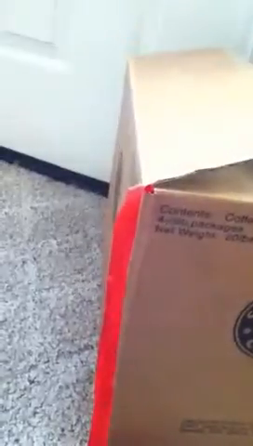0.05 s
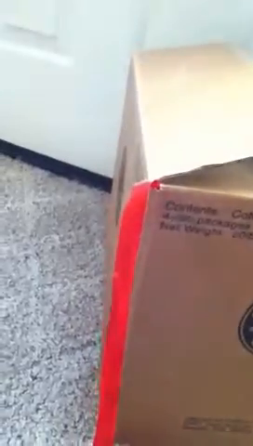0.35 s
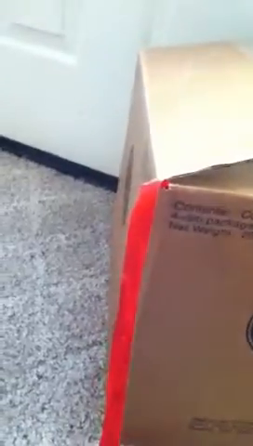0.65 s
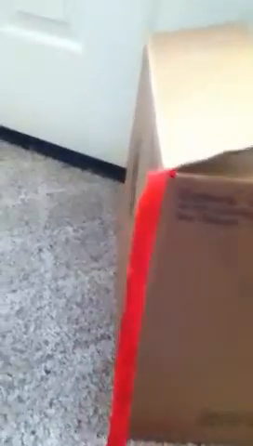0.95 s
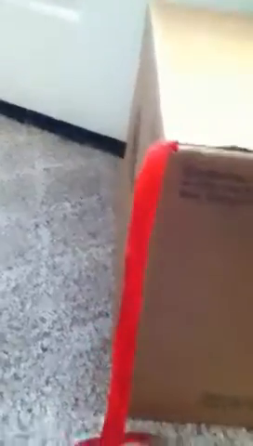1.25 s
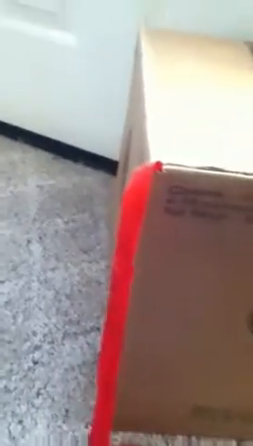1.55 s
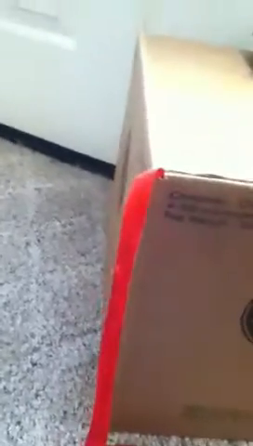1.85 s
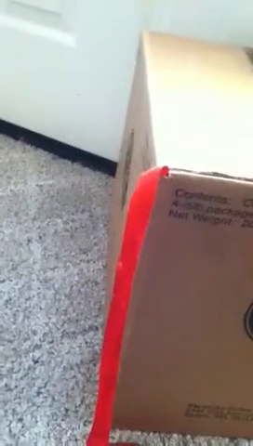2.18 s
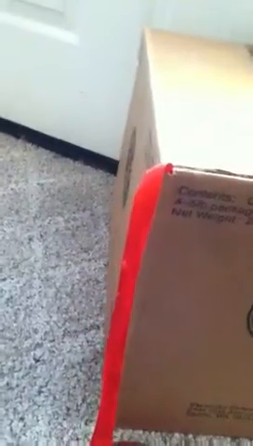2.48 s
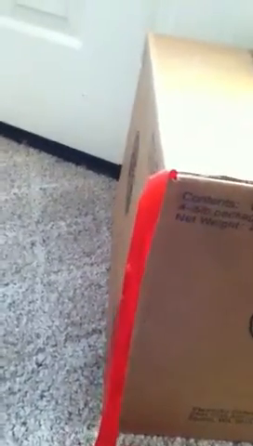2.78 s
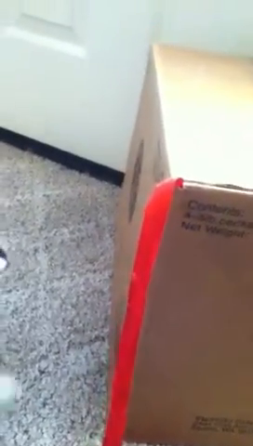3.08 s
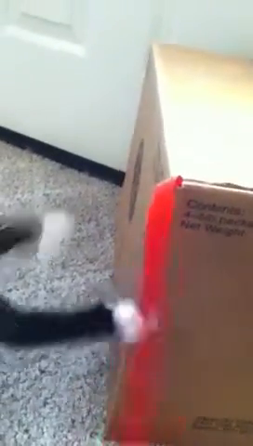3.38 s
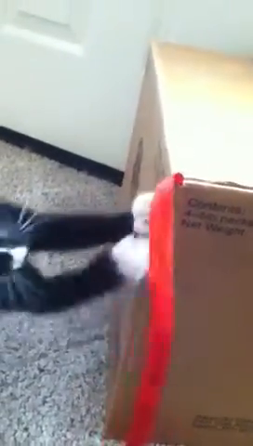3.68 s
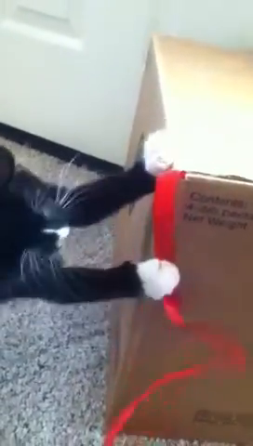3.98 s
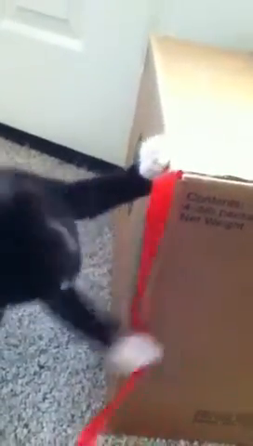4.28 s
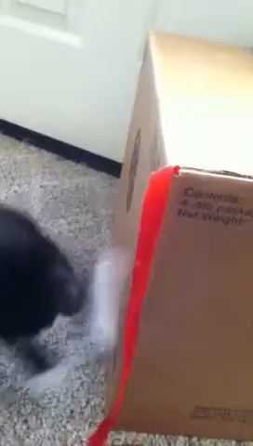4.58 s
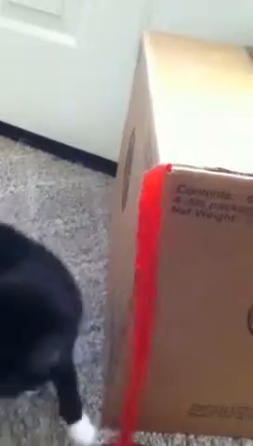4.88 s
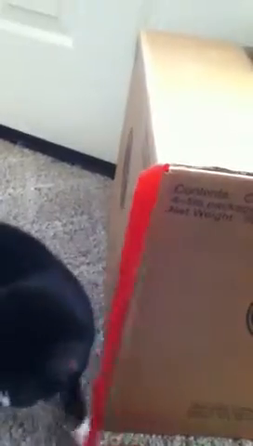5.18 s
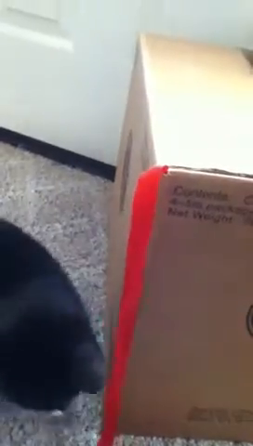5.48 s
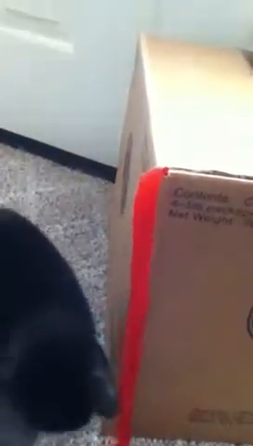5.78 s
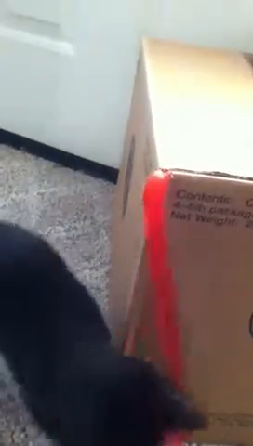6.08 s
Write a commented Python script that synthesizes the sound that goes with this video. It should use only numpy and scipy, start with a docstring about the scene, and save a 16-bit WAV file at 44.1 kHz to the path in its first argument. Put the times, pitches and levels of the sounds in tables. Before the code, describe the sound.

Close to the microphone, claws tick and scratch lightly on a cardboard box while fur and ribbon rustle against it. A single dull thump interrupts the faint sounds. Then the cat bats the box several times in quick succession, making hollow, papery knocks, the loudest sounds heard. It settles to soft brushing and ends with one more bump and a claw drag. The small indoor room is otherwise quiet.

```python
"""Faint brushing and light scratches on cardboard, then hollow thumps: a kitten plays at a box.
Fur and a cloth ribbon hiss over the surface, pads judder as they push the walls,
and claws scrape and click on the paper skin. Paw blows, the loudest sounds, make the box ring and boom.
The box stands close by, on the carpet of a small, quiet room."""
import sys
import numpy as np
from scipy import signal
from scipy.fft import rfft, irfft, next_fast_len
from scipy.io import wavfile
from scipy.ndimage import map_coordinates

SR = 44100
rng = np.random.default_rng(int(sys.argv[2]) if len(sys.argv) > 2 else 0)


def int16_out(signal):
    """Quantize to a 16-bit WAV file."""
    q = np.round(np.clip(np.atleast_2d(signal).T, -1, 1) * 32767)
    wavfile.write(sys.argv[1], SR, q.astype(np.int16))


N = 275625


def amp(db):
    """Decibels to gain."""
    return 10 ** (np.asarray(db) / 20)


def unit(x):
    """Scale to rms 1."""
    return x / np.sqrt(np.mean(x ** 2) + 1e-20)


def along(points, hz):
    """Interpolate (freq_hz, value) points on a log frequency axis."""
    freq_hz, values = np.transpose(points)
    return np.interp(np.log(hz + 1), np.log(freq_hz + 1), values)


def add(track, start_s, sound):
    """Mix sound into track at start_s."""
    part = track[max(round(start_s * SR), 0):][:len(sound)]
    part += sound[:len(part)]


def filtered(x, response):
    """Apply a complex frequency response."""
    size = next_fast_len(len(x) + 8192)
    return irfft(rfft(x, size) * response(np.fft.rfftfreq(size, 1 / SR)), size)[:len(x)]


def coloured(x, spectrum):
    """Shape x by (freq_hz, gain_db) points; rms 1."""
    return unit(filtered(x, lambda f: amp(along(spectrum, f))))


def resonances(modes, f):
    """Response of (freq_hz, width_hz, gain_db) modes, summed with alternating sign."""
    return sum((-1) ** k * amp(db) * 1j * f * width_hz / (hz * hz - f * f + 1j * f * width_hz)
               for k, (hz, width_hz, db) in enumerate(modes))


def band(x, hz, breadth):
    """One resonance, breadth * hz wide; rms 1."""
    return unit(filtered(x, lambda f: resonances([(hz, breadth * hz, 0)], f)))


def gliding(x, hz, breadth, count=4):
    """Resonance that follows hz by cross-fading static bands."""
    centres_hz = np.geomspace(hz.min(), hz.max() + 1, count)
    return sum(np.interp(hz, centres_hz, share) * band(x, centre_hz, breadth)
               for centre_hz, share in zip(centres_hz, np.eye(count)))


def curves(rows):
    """Gain and pitch per sample from (time_s, level_db, pitch_hz) rows; silent outside them."""
    time_s, level_db, pitch_hz = np.transpose(rows)
    t = np.arange(N) / SR
    active = (t >= time_s[0]) & (t <= time_s[-1])
    return amp(np.interp(t, time_s, level_db)) * active, np.interp(t, time_s, pitch_hz)


def stroke(peak_s, rise_s, fall_s):
    """Speed of one movement: Gaussian swell and decay."""
    t = np.arange(N) / SR - peak_s
    width_s = np.where(t < 0, rise_s, fall_s)
    return np.exp(-np.minimum((t / width_s) ** 2 / 2, 30))


def sweep(start_s, length_s, rise_share=0.16, release_share=0.66):
    """Speed of one sweep: ramp, hold, decay."""
    t = np.arange(N) / SR - start_s
    ramp = np.clip(t / (rise_share * length_s), 0, 1)
    return ramp * np.exp(-np.maximum(t - length_s, 0) / (release_share * length_s))


def friction(n, rate_hz, smooth):
    """Random slips, mostly small, over smooth sliding noise."""
    slips = (rng.random(n) < rate_hz / SR) * rng.laplace(size=n)
    return unit(slips) + smooth * rng.standard_normal(n)


def grip(rate_hz, depth_db):
    """Gain of a contact that catches and lets go at random."""
    knots = rng.standard_normal(int(N * rate_hz / SR) + 4)
    wander = map_coordinates(knots, [np.arange(N) * rate_hz / SR], order=1)
    return unit(amp(depth_db * wander))


# room tone: freq_hz, gain_db
AIR_SPECTRUM = [(15, -46), (25, -12.5), (107, -0.5), (144, -4), (205, -3), (352, -10), (403, -7.5),
                (654, -12.5), (1360, -15.5), (1470, -16.5), (1590, -17.5), (1780, -16.5), (15800, -26.5)]


def air():
    """Steady room tone: low rumble, faint hiss."""
    return amp(-58) * coloured(rng.standard_normal(N), AIR_SPECTRUM)


# room decay: freq_hz, t60_s
ROOM_DECAY = [(150, 0.66), (800, 0.52), (3000, 0.47), (10000, 1)]
# door and wall echoes: delay_s, gain_db
ROOM_ECHOES = [(0.0223, -15), (0.035, -32.5), (.038, -12)]


def room(x):
    """Dull echoes off door and walls, plus the short tail of a carpeted room."""
    hz, t, noise = signal.stft(rng.standard_normal(SR // 2), SR, nperseg=256)
    decay = amp(-60 * t / along(ROOM_DECAY, hz)[:, None])
    build_up = 1 - np.exp(-t / 0.0125)
    tail = signal.istft(noise * decay * build_up, SR, nperseg=256)[1]
    tail = filtered(tail / np.linalg.norm(tail), lambda f: 1 / (1 + 1j * f / 2500))
    out = np.zeros(N)
    add(out, 0.008, amp(-14) * signal.fftconvolve(x, tail))
    dull = filtered(x, lambda f: 1 / (1 + (f / 700) ** 2))
    for delay_s, gain_db in ROOM_ECHOES:
        add(out, delay_s, amp(gain_db) * dull)
    return out


# bending waves back from the folds: delay_s, gain_db
FOLD_ECHOES = [(.0009, -35), (.0026, -22.5), (.0048, -22.5)]


def rubbing(rate_hz, smooth, grip_hz, depth_db):
    """Uneven friction on cardboard; reflections from the folds ripple its spectrum."""
    contact = friction(N, rate_hz, smooth) * grip(grip_hz, depth_db)
    out = contact.copy()
    for delay_s, gain_db in FOLD_ECHOES:
        add(out, delay_s, amp(gain_db) * contact)
    return unit(out)


# brushed wall: freq_hz, gain_db
MURMUR_SPECTRUM = [(40, -23), (100, -5.5), (220, 5.5), (380, 1), (510, -8.5), (780, -0.5), (1350, -7),
                   (2000, -7), (4500, -18), (9000, -28.5), (16000, -41)]
# brushed surface fibres: freq_hz, gain_db
HISS_SPECTRUM = [(500, -13), (2500, 6.5), (4500, 0.5), (6500, -2.5), (9000, -1), (11000, -6), (13000, -12),
                 (16000, -38)]
# fur and ribbon sweeps: start_s, length_s, murmur_db, hiss_db
SWEEPS = [(0, 0.031, -54, -56), (0.03, 0.15, -59, -59.5), (0.17, 0.2, -55, -58.5), (0.497, 0.047, -50, -65),
          (0.608, 0.12, -49.5, -55), (0.793, 0.15, -53.5, -56.5), (1.108, 0.049, -54.5, -53.5),
          (1.183, 0.22, -51.5, -50.5), (1.326, 0.069, -42, -54.5), (1.646, 0.059, -47, -57.5),
          (1.735, 0.04, -44, -63), (2.27, 0.11, -58.5, -57), (2.453, 0.034, -56, -54),
          (2.692, 0.27, -56, -62.5), (3.427, 0.021, -47.5, -42), (3.539, 0.12, -51, -54),
          (3.757, 0.044, -44.5, -46.5), (3.991, 0.21, -55, -60.5), (4.303, 0.024, -36.5, -47.5),
          (4.384, 0.09, -55.5, -68), (4.626, 0.05, -57.5, -51.5), (5.197, 0.12, -62.5, -73),
          (5.58, 0.051, -50.5, -78), (5.917, 0.023, -43, -41), (5.965, 0.059, -55, -45.5),
          (6.107, 0.038, -54, -43.5), (6.16, 0.09, -55, -50)]


def brushes(hiss_trim_db=-3):
    """Fur and cloth hiss on the surface; the wall murmurs under them."""
    murmur_power = sum((amp(db) * sweep(start_s, length_s)) ** 2 for start_s, length_s, db, _ in SWEEPS)
    hiss_power = sum((amp(db) * sweep(start_s, length_s)) ** 2 for start_s, length_s, _, db in SWEEPS)
    murmur = coloured(rubbing(rate_hz=2500, smooth=0.82, grip_hz=60, depth_db=2), MURMUR_SPECTRUM)
    fibres = coloured(rubbing(rate_hz=12000, smooth=0.55, grip_hz=140, depth_db=2), HISS_SPECTRUM)
    hiss = amp(hiss_trim_db) * band(fibres, hz=7800, breadth=0.99)
    return np.sqrt(murmur_power) * murmur + np.sqrt(hiss_power) * hiss


# pushed wall: freq_hz, width_hz, gain_db
FLEX_MODES = [(234.3, 47, 6), (386.6, 55, 2.5), (720, 86, -4.5), (960, 60, -5.5), (1180, 140, -5.5)]
# paw slipping under light pressure: time_s, level_db, pitch_hz
LIGHT_LEAN = [(3.06, -67, 276), (3.102, -39, 281), (3.14, -57, 276), (3.15, -45, 273)]
# paw slipping under hard pressure: time_s, level_db, pitch_hz
HARD_LEAN = [(3.19, -30.5, 262), (3.198, -31.5, 259), (3.216, -27, 267), (3.284, -49.5, 353),
             (3.302, -38.5, 350), (3.342, -38, 333), (3.378, -53.5, 284), (3.414, -35, 283),
             (3.5, -60, 257.4)]


def pushes(lean_trim_db=-0.5, settle_re_boom_db=-26, settle_lag_s=0.018):
    """A pad judders along the wall and flexes it, while leaning and briefly after each blow."""
    judder = filtered(friction(N, rate_hz=2600, smooth=1.45), lambda f: resonances(FLEX_MODES, f))
    leaning = sum(gain * gliding(judder, pitch_hz, breadth=0.95)
                  for gain, pitch_hz in map(curves, (LIGHT_LEAN, HARD_LEAN)))
    settling = np.zeros(N)
    for start_s, _, _, boom_db, _, _ in PAW_BLOWS:
        speed = stroke(start_s + settle_lag_s, rise_s=settle_lag_s / 3, fall_s=0.011)
        settling += amp(boom_db + settle_re_boom_db) * speed
    return amp(lean_trim_db) * leaning + settling * band(judder, hz=434, breadth=0.93)


# scraped wall: freq_hz, width_hz, gain_db
SCRAPE_MODES = [(980, 580, 4.5), (1525, 20, -2.5), (1844, 18, 7.5), (1993, 65, 3), (2446, 26, 6.5),
                (2950, 330, -13), (3900, 770, -38)]
# short claw scratches: peak_s, level_db, pitch_hz
CLAW_SCRATCHES = [(0.008, -43.5, 2500), (1.157, -39.5, 2540), (1.669, -42, 3230), (1.689, -37.5, 2740),
                  (1.763, -40, 1620), (2.426, -43, 2840), (2.811, -41.5, 2078), (3.785, -42.5, 3200),
                  (4.314, -26.5, 2400), (4.332, -35.5, 2090), (6.124, -45, 2400)]
# long claw drags, one list each: time_s, level_db, pitch_hz
CLAW_DRAGS = [
    [(0.15, -80, 2220), (0.174, -44, 2250), (0.202, -48, 2160), (0.218, -38.5, 2550), (0.296, -52, 2820),
     (0.366, -44, 2600), (0.406, -63, 2086), (0.42, -62, 1980)],
    [(6.105, -65, 2360), (6.111, -36.5, 2370), (6.125, -31, 2230), (6.171, -37, 1840), (6.189, -35.5, 1970),
     (6.213, -44.5, 2020), (6.241, -38, 2570), (6.25, -38, 2480)],
]


def scrapes(scratch_trim_db=-4, drag_trim_db=-0.5):
    """Claws stick and slip on the paper skin; wall modes stand out of the broadband rasp."""
    def wall(f):
        modes = sum(resonances([mode], f) for mode in SCRAPE_MODES)
        return (amp(-11.5) + modes) * f / (f + 700) / (1 + (f / 11500) ** 6)

    rasp = filtered(rubbing(rate_hz=3000, smooth=0.67, grip_hz=160, depth_db=2.2), wall)
    out = np.zeros(N)
    for peak_s, level_db, pitch_hz in CLAW_SCRATCHES:
        speed = stroke(peak_s, rise_s=0.0054, fall_s=0.0069)
        out += amp(level_db + scratch_trim_db) * speed * band(rasp, pitch_hz, breadth=0.64)
    for gain, pitch_hz in map(curves, CLAW_DRAGS):
        out += amp(drag_trim_db) * gain * gliding(rasp, pitch_hz, breadth=0.68)
    return out


# claw clicks: start_s, level_db, pitch_hz
CLAW_TICKS = [(0.1664, -34, 2500), (0.44, -33.5, 3380), (0.78, -36, 2955), (0.8307, -35.5, 2680),
              (1.308, -35.5, 3030), (1.3663, -20.5, 5770), (1.381, -26, 6200), (1.408, -33, 2800),
              (1.669, -28, 2830), (1.6833, -29, 2755), (2.283, -37, 1340), (2.4315, -29.5, 2500),
              (2.7969, -34.5, 1816), (2.9286, -32.5, 5000), (3.406, -39, 1510), (3.435, -35, 4500),
              (3.5492, -22.5, 6960), (3.7469, -8.5, 5850), (3.9918, -17, 7000), (4.779, -40.5, 1900)]


def ticks(trim_db=-1.5, crackle_t60_s=0.033):
    """A claw tip snaps free with one click; fibres crackle after it."""
    out, t = np.zeros(N), np.arange(SR // 25) / SR
    for start_s, level_db, pitch_hz in CLAW_TICKS:
        snap = 0.25 * rng.standard_normal(len(t)) * amp(-60 * t / crackle_t60_s)
        snap[0] = 3  # the click
        snap = band(band(snap, pitch_hz, breadth=0.9), pitch_hz, breadth=1.3)
        add(out, start_s, amp(level_db + trim_db) * snap / np.abs(snap).max())
    return filtered(out, lambda f: 1 / (1 + (f / 12000) ** 6))  # paper damps the top treble


def radiated(x, cutoff_hz):
    """A panel radiates little below its cutoff."""
    return filtered(x, lambda f: 1 / (1 - (cutoff_hz / (f + 1)) ** 2 - 1j * cutoff_hz / (f + 1)))


# struck box: freq_hz, t60_s, level_db
BOX_MODES = [(149, 0.52, -37), (224.5, 0.1, -15.5), (374, 0.046, -8.5), (477, 0.052, -22.5),
             (596, 0.041, -12), (803, 0.03, -5.5), (1024, 0.037, -9.5), (1368, 0.0058, -19.5),
             (1510, 0.022, -14), (2170, 0.042, -20.5), (2980, 0.01, -14.5)]
# crushed paper fibres: freq_hz, gain_db
CRUNCH_SPECTRUM = [(100, -50), (350, 13.5), (900, 5.5), (2000, 3), (3200, 0.5), (4500, -8.5), (6300, -11),
                   (9000, -10), (12000, -18.5), (16000, -40)]
# paw blows: start_s, slap_db, hardness_hz, boom_db, boom_hz, crunch_db
PAW_BLOWS = [(0.519, -35.5, 2000, -58, 260, -57), (0.617, -39.5, 2120, -54, 265, -44),
             (0.8189, -13.5, 635, -7.5, 200.5, -65), (1.153, -62, 1200, -38.5, 193, -44),
             (1.746, -41, 2000, -56, 240, -48), (1.7631, -27, 1900, -64, 244, -45),
             (3.162, -44, 450, -23.5, 308, -49), (3.1754, -15.5, 940, -12, 312, -35.5),
             (3.549, -51, 1800, -29.5, 179, -35), (3.725, -30, 1100, -28, 259, -36),
             (3.7471, -15.5, 1270, -18, 361, -16.5), (3.9917, -4.5, 1820, -31, 189, -22),
             (3.9961, -2, 1790, -8.5, 191, -49), (4.301, -23.5, 3430, -16.5, 224.4, -23.5),
             (4.3098, -19, 1480, -13.5, 215, -25.5), (4.476, -39, 1790, -57, 232, -40),
             (5.602, -40, 800, -40, 208, -63), (5.8914, -42, 2500, -63, 215, -36),
             (5.9109, -24, 1740, -21, 213, -30)]


def blows(boom_t60_s=0.035, crunch_t60_s=0.042, crunch_trim_db=-3):
    """A paw slaps the wall, the whole panel booms, and claws crush paper fibres."""
    out, t = np.zeros(N), np.arange(SR // 4) / SR
    boom_attack = 1 - np.exp(-t / 0.0015)
    for start_s, slap_db, hardness_hz, boom_db, boom_hz, crunch_db in PAW_BLOWS:
        ring = np.zeros(len(t))
        for freq_hz, t60_s, level_db in BOX_MODES:
            detune = 1 + rng.normal(0, 0.015)  # each spot rings differently
            ring += amp(level_db - 60 * t / t60_s) * np.cos(2 * np.pi * freq_hz * detune * t)
        # a soft pad excites only the low modes
        slap = amp(slap_db) * filtered(ring, lambda f: 1 / (1 + 1j * f / hardness_hz) ** 3)
        boom = amp(boom_db - 60 * t / boom_t60_s) * np.sin(2 * np.pi * boom_hz * t) * boom_attack
        slips = friction(len(t), rate_hz=14000, smooth=0.29)
        slips[SR // 4000] += 7  # crack of first contact
        crunch = coloured(slips, CRUNCH_SPECTRUM) * amp(crunch_db + crunch_trim_db - 60 * t / crunch_t60_s)
        add(out, start_s, radiated(slap + boom, cutoff_hz=0.58 * boom_hz) + crunch)
    return out


def scene():
    """Kitten and box in a quiet room; the small walls radiate no deep bass."""
    box = blows() + ticks() + scrapes() + brushes() + pushes()
    box = signal.sosfilt(signal.butter(2, 50, "highpass", fs=SR, output="sos"), box)
    return (air() + box + room(box))[None]


def record(dry, low_hz=45, top_hz=15850):
    """Microphone: bass roll-off and a hard upper band limit."""
    return filtered(dry[0], lambda f: 1j * f / (1j * f + low_hz) * (f < top_hz))[None]


dry = scene()
out = record(dry)
int16_out(out)
```